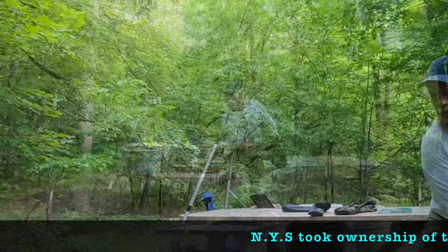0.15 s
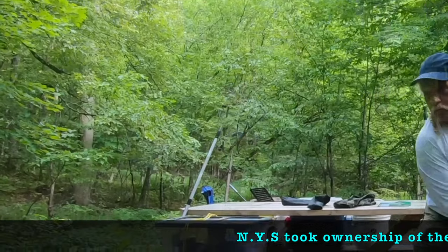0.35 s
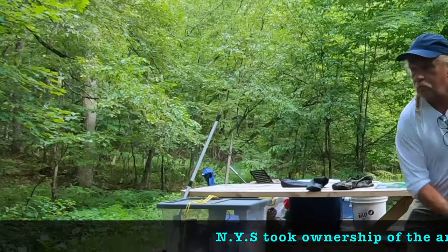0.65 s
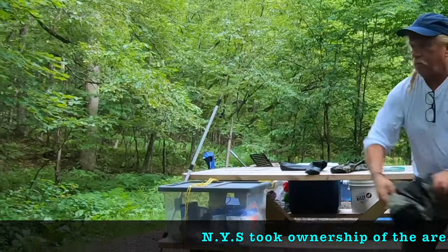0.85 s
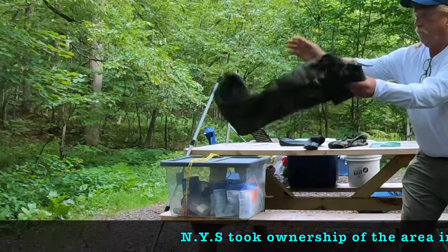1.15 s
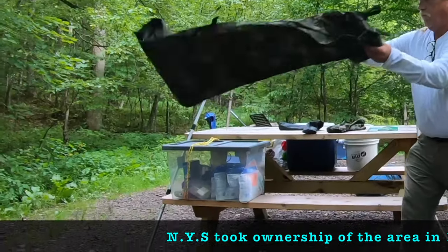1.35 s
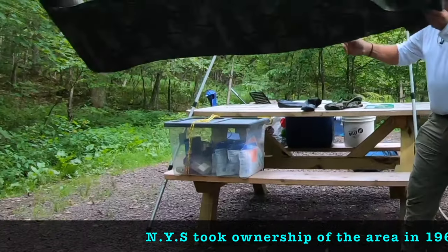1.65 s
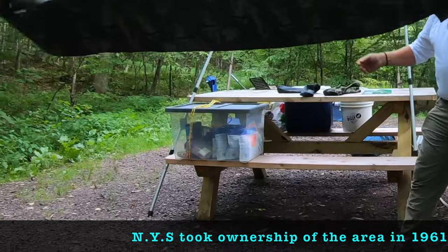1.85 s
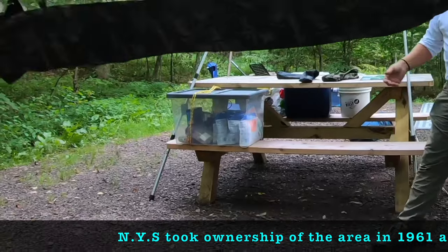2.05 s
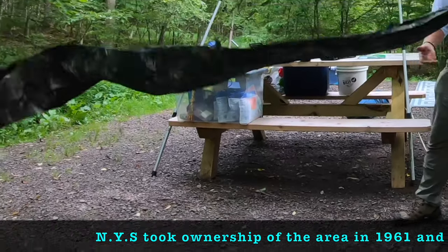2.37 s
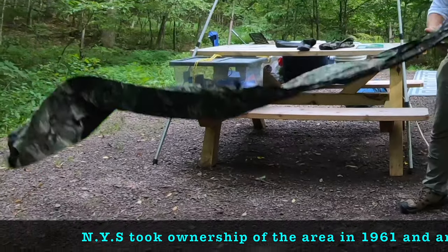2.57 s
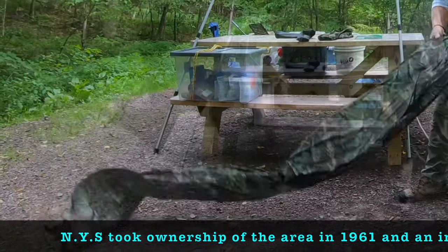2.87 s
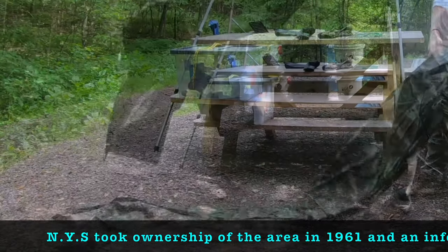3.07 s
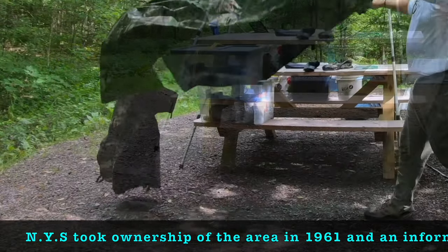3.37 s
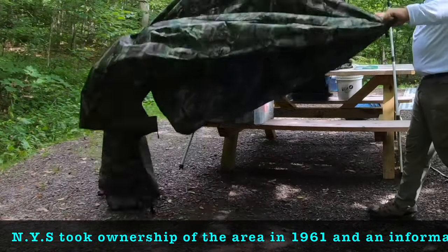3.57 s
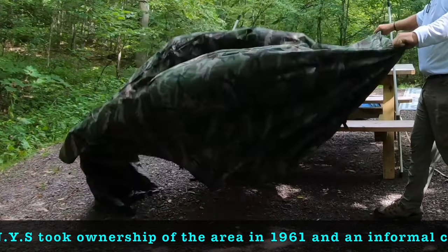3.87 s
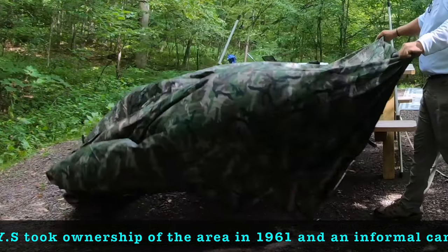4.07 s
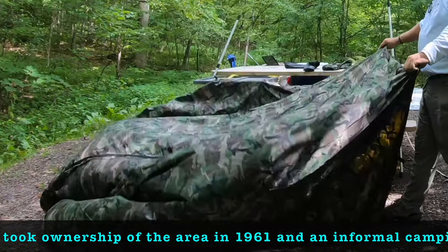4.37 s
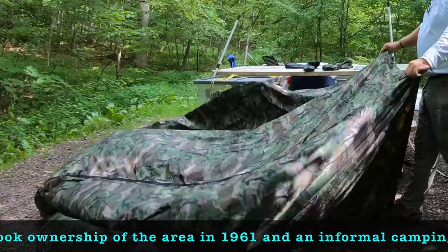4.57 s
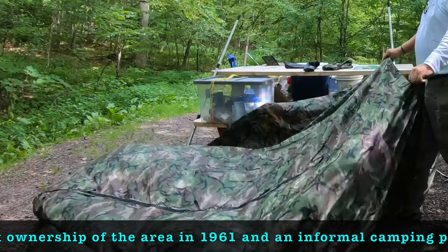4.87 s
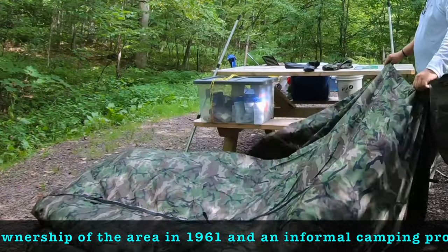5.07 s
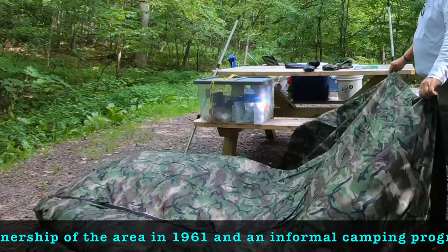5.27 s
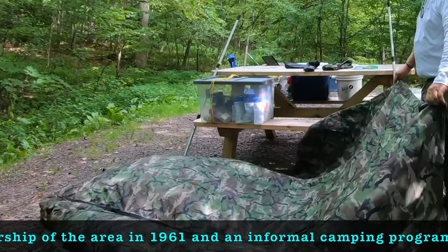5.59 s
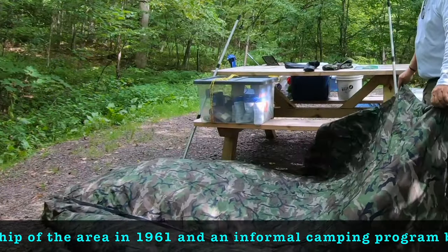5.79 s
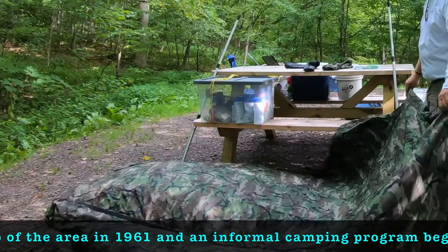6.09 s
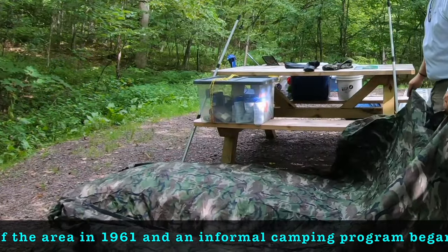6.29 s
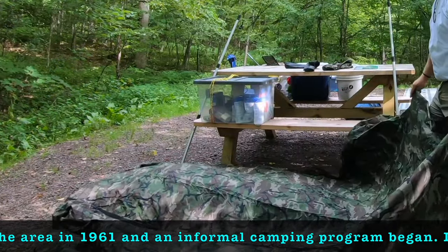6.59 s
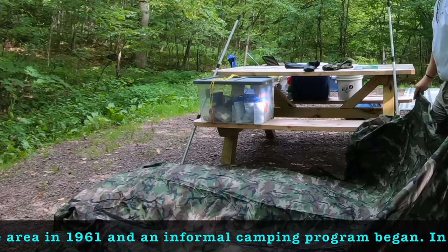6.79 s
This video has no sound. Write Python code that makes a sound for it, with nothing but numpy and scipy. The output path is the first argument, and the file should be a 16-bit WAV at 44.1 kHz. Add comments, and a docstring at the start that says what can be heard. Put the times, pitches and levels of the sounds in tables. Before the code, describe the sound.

Close by, a big fabric sheet opens with a light swish and a run of snaps, then flaps in heavy, muffled waves. Creases crackle and the cloth thumps as it pulls tight, loudest a little before halfway. After another low billow it eases into softer rustling as it is spread over the ground. The woodland behind is faint: a thin steady tone, far leaves and a brief low hum.

```python
"""A bright swish and quick snaps: a large tarp is shaken out, then spread on gravel in a wood.
It sounds deep and dull, as if slowed down. Creases buckle in dense clicks, folds snap open, and the
sheet billows, thumps and drums as it pulls taut; air whistles off the hem.
Behind it are a thin steady tone in the trees, a brief low hum, far leaves and faint hiss."""
import sys
import numpy as np
from scipy import signal
from scipy.fft import rfft, irfft, next_fast_len
from scipy.io import wavfile
from scipy.ndimage import uniform_filter1d

SR = 44100
rng = np.random.default_rng(int(sys.argv[2]) if len(sys.argv) > 2 else 0)


def to_wav(sig):
    """Store sig (one row per channel, or 1-D mono) as 16-bit WAV at the path in sys.argv[1].

    Samples outside -1..1 are clipped; the rate is SR.
    """
    pcm = np.clip(np.atleast_2d(sig), -1, 1) * 32767
    pcm = np.round(pcm).astype(np.int16)
    wavfile.write(sys.argv[1], SR, pcm.T)  # frames by channels


N = 306136
TIME_S = np.arange(N) / SR

# Flaps of the sheet. Each row: start of hold in seconds, rise in seconds per 20 dB, hold in seconds,
# level in dB, then deep gust, billow and fine crinkle in dB above that level.
FLAPS = [(.03, 0.062, 0.037, -34.5, -29, -14.5, -9.5), (.15, .02, 0.13, -23, -23, -6, -18),
         (.37, .015, 0.055, -30.5, -32, -13, -22.5), (.446, 0.11, 0.074, -26.5, -37, -15.5, -16.5),
         (.58, .1, 0.04, -20.5, -40, -12, -20), (0.807, 0.13, .12, -32, -30, -8, -21.5),
         (1.128, 0.11, .13, -24.5, -26, -7.5, -17.5), (1.368, .15, 0.05, -22, -40, -12.5, -20.5),
         (1.525, 0.24, 0.12, -23, -30, -11.5, -21), (1.71, 0.047, 0.045, -22, -28, -17, -21),
         (1.8, 0.051, 0.047, -25.5, -25, -15, -20.5), (2.0, 0.071, 0.028, -21.5, -14, -6, -20.5),
         (2.075, 0.045, .03, -16.5, -12, -8, -20.5), (2.139, .06, 0.081, -22, -29, -6.5, -23.5),
         (2.335, 0.089, 0.06, -20, -49, -14, -24), (2.521, 0.028, .02, -31, -41, -11, -21.5),
         (2.66, 0.03, .04, -30.5, -28, -7, -15.5), (2.702, 0.014, 0.03, -17.5, -16, -3, -16),
         (2.814, 0.014, 0.052, -20, -10, -2.5, -20), (2.9, .03, .02, -27.5, -16, -11, -9),
         (3.21, 0.09, .07, -28, -19, -6.5, -13.5), (3.312, 0.069, .12, -19.5, -16, -8.5, -21.5),
         (3.45, .08, .11, -20.5, -18, -10, -16.5), (3.602, 0.066, 0.061, -25.5, -22, -10, -20),
         (3.803, 0.041, .02, -26, -18, -3, -20.5), (4.081, 0.077, .03, -25, -4, -4, -20),
         (4.188, .03, 0.092, -26.5, -11, -5, -18.5), (4.742, 0.046, .02, -27.5, -29, -7, -15),
         (5.05, 0.056, 0.027, -31, -32, 1, -11.5), (5.188, 0.059, 0.015, -35, -37, -6, -8),
         (5.678, 0.093, 0.043, -30.5, -31, -8, -11.5), (5.895, .04, .025, -29.5, -40, -14, -9),
         (6.265, 0.06, 0.047, -31, -39, -8, -11), (6.41, .04, .025, -32, -40, -9, -11)]
# The sheet dragging and settling. Each row: time in seconds, level in dB, then deep gust, billow and
# fine crinkle in dB above that level.
DRAG = [(0, -49, -34, -16, -15), (.45, -39.5, -35, -8, -14), (.75, -36, -29, -9, -12),
        (1.03, -35.5, -25, -4, -12.5), (1.28, -29, -29, -10, -3), (1.86, -29, -22.5, -11, -15),
        (2.3, -29.5, -34, -12, -19.5), (2.62, -36.5, -25, -11, -16.5), (2.95, -36, -17, -5, -13.5),
        (3.11, -39.5, -27, -10.5, -16), (3.7, -32, -21.5, -2, -16), (3.95, -30, -14.5, -7, -13.5),
        (4.3, -25.5, -10, -4, -8), (4.55, -27, -16, -7.5, -6.5), (4.97, -31, -32.5, -9, -6),
        (5.49, -33, -32, -7.5, -10.5), (5.92, -32, -39, -15.5, -5.5), (6.4, -32.5, -37, -11, -7.5),
        (6.84, -33.5, -30, -3.5, -9), (6.94, -28, -28, -12, -15)]
# Crease sizes, deep to fine. Each row: top in Hz, clicks per cycle, size spread in dB, flicker in dB,
# share of the common shake, share of the quick motion, offset in dB, share of gust, billow or crinkle.
CREASE_BANDS = [(59, 0.9, 1.8, -0.5, 0.43, 0.65, -0.5, 1), (132, .5, 3.6, 2, 0.56, 0.88, -0.5, 1),
                (526, .4, 2.02, 1.17, 0.8, 0.89, -4.5, -0.13), (1220, .4, 1.4, 1.97, 0.87, 0.85, 2.5, 0.61),
                (3078, .4, 1.1, 0.8, 0.82, 0.8, 0, 0.99), (9000, .6, 1.2, 2.3, 0.79, 0.49, -17, 0.95)]
# Cloth spectrum before band levels are set. Each row: frequency in Hz, gain in dB.
CLOTH_SPECTRUM = [(18, -17), (38, -8.5), (52, -16), (66, -1.5), (160, 0), (250, -0.5), (500, -5),
                  (1000, -12), (1600, -16), (2600, -28), (3900, -33), (5000, -43), (7100, -54),
                  (8000, -77.5)]
# Cloth stereo width. Each row: frequency in Hz, side minus mid in dB.
CLOTH_WIDTH = [(30, -31.5), (80, -15), (170, -11.5), (350, -9.5), (700, -6.5), (1300, -12), (2400, -15),
               (4400, 1.5), (8000, -2)]
# Cloth position. Each row: time in seconds, left minus right in dB.
CLOTH_PAN = [(0.0, -2), (1.29, -2.5), (1.51, 0), (6.94, -0.3)]
# Folds snapping open. Each row: start in seconds, peak in dB, ring in Hz, left minus right in dB.
SNAPS = [(0.1285, -25, 1100, -4.0), (0.1758, -13, 400, 0), (0.367, -23, 466, -7), (0.443, -13.5, 584, -6),
         (0.483, -12.5, 435, -5), (0.555, -16, 420, -4), (0.903, -12.5, 700, -4), (0.964, -25, 900, 0),
         (1.106, -25, 404, 4), (1.384, -8.5, 506, -5), (1.994, -13, 574, -2), (2.275, -17.5, 439, -5),
         (2.492, -25, 700, 0), (2.521, -16.5, 630, -8), (2.582, -18.5, 464, -11), (2.702, -13, 1080, 6),
         (2.722, -11.5, 330, 2), (2.7265, -7.5, 1150, 6), (2.736, -16, 950, -2), (2.813, -19, 900, 5),
         (3.799, -23, 401, 9), (4.018, -19, 444, 3), (4.187, -14.5, 600, 4), (4.249, -11, 770, 3),
         (4.763, -14.5, 802, -6), (5.747, -19, 824, 1), (6.262, -20, 850, -2)]
# The sheet pulled taut or slapping the ground. Each row: start in seconds, level in dB, ring in Hz,
# t60 in seconds.
THUMPS = [(0.151, -14.5, 268, 0.036), (.222, -18, 244, 0.087), (0.581, -16.5, 204, 0.036),
          (.628, -12, 248, 0.05), (1.424, -12, 218, 0.053), (1.714, -8, 230, 0.038),
          (2.124, -9, 221, 0.013), (2.352, -13, 176, 0.037), (2.7315, -6.5, 247, 0.047),
          (2.8176, 1, 130, 0.018), (4.0913, -7, 110, 0.051), (4.109, -16, 76, 0.15),
          (4.194, -14, 116, 0.046), (4.2818, -16, 110, 0.04), (5.672, -21, 130, 0.05)]
# Thin ticks on the sharpest peaks. Each row: time in seconds, relative level in dB.
TICKS = [(0.176, -49), (0.4843, -50), (0.628, -54), (1.1932, -54), (1.4067, -47), (1.708, -48),
         (2.0911, -54), (2.1246, -55), (4.1889, -56), (2.7018, -49), (2.7224, -50), (2.7264, -49),
         (2.7312, -43), (2.8174, -38.5), (3.4111, -53), (4.0896, -48), (4.2502, -44), (6.2806, -57)]
# The taut sheet drumming. Each row: time in seconds, pitch in Hz, level in dB.
DRUM = [(1.486, 144.7, -31), (1.52, 151.6, -24.5), (1.55, 166, -20), (1.578, 168, -41), (1.615, 163, -29.5),
        (1.652, 162, -14), (1.676, 177, -28), (1.688, 182.5, -21), (1.702, 183.3, -30), (1.718, 174.6, -14),
        (1.74, 166.6, -26), (1.758, 166.3, -12), (1.785, 164.4, -25), (1.84, 169.6, -33)]
# Air whistling off the hem. Each row: time in seconds, level in dB.
HEM_LEVELS = [(1.42, -52), (1.52, -41.5), (1.64, -43.5), (1.77, -44.5), (1.86, -53)]
# Opening swish. Each row: time in seconds, mid level in dB.
SWISH_LEVELS = [(0.0, -73), (0.03, -51), (.085, -56), (.115, -62), (.16, -64), (0.36, -78)]
# Swish spectrum. Each row: frequency in Hz, relative gain in dB.
SWISH_SPECTRUM = [(1760, -36), (3000, 1), (4440, -13), (5270, -5.5), (8070, -10.5), (12900, -34),
                  (15500, -54.5)]
# Thin tone, likely insects. Each row: pitch in Hz, waver in Hz, left minus right in dB.
TONES = [(868, 2.004, -3.5)]
# Swell of that tone. Each row: time in seconds, level in dB.
TONE_LEVELS = [(0, -49.5), (2.5, -65), (4.2, -45), (5.2, -43.5), (6.0, -42), (6.94, -43.5)]
# Low hum that swells briefly. Each row: time in seconds, pitch in Hz, level in dB.
HUM = [(5.7, 214.8, -42.5), (6.21, 216.7, -41.5), (6.3, 234, -48)]

FLAP_FALL_DB_PER_S, BLEND_S, SWEEP_S = 240.5, 0.029, 0.12
CALM_SHARE = 0.45  # unrest left while the sheet only drags
SHAKE_KICK_DB, SHAKE_DECAY_S = 4, 0.006
SNAP_T60_CYCLES, CRACK_HZ, CRACK_DB = 5.5, 2600, -19
SUCTION_SHARE = 0.32  # of a thump's peak
TICK_GAIN_DB, TICK_DELAY_S, TICK_TAIL_DB, TICK_TAIL_S = 12, 0.0012, -22, 0.004
HEM_HZ, HEM_WIDTH_HZ, HEM_TOP_HZ = 3900, 1200, 6800
LEAVES_DB, LEAVES_TOP_HZ, HISS_DB, HISS_TOP_HZ = -57.5, 2600, -93.5, 10000
TOP_HZ = 15600
FFT_SIZE = next_fast_len(N)
BINS_HZ = np.fft.rfftfreq(FFT_SIZE, 1 / SR) + 1


def rustle():
    """Creases buckle at random; big ones follow each jerk of the sheet, the finest more its slow sweep."""
    motion_db, flapping, gust_db, billow_db, crinkle_db = motion()
    unrest = CALM_SHARE + (1 - CALM_SHARE) * flapping
    window = int(SWEEP_S * SR)
    sweep_db = 10 * np.log10(uniform_filter1d(uniform_filter1d(undb(2 * motion_db), window), window))
    colour = bin_gains(CLOTH_SPECTRUM) * np.array([np.ones(len(BINS_HZ)), bin_gains(CLOTH_WIDTH)])
    shake_db = 1.5 * unrest * walk(28) + aftershake_db()
    pitches_hz = 24 * 2 ** (np.arange(26) / 3)
    out, low_hz = 0, 1
    for band, control_db in zip(CREASE_BANDS, [gust_db, billow_db] + 4 * [crinkle_db]):
        top_hz, density, spread_db, flicker_db, shake, quick, offset_db, share = band
        clicks = sum(undb(flicker_db * unrest * walk(13)) * creases(hz, density, spread_db)
                     for hz in pitches_hz[(pitches_hz >= low_hz) & (pitches_hz < top_hz)])
        low_cut = 1 / np.sqrt(1 + (low_hz / BINS_HZ) ** 10)  # nothing rings below its own size
        spectrum = rfft(clicks * undb(shake * shake_db), FFT_SIZE)
        mid, side = irfft(spectrum * colour * low_cut, FFT_SIZE)[:, :N]
        level_db = sweep_db + quick * (motion_db - sweep_db) + offset_db + share * control_db
        out = out + undb(level_db) / mid.std() * np.array([mid + side, mid - side])
        low_hz = top_hz
    return out * pan(curve(CLOTH_PAN)[0])


def motion():
    """Flaps rise, hold and fall over the drag; the loudest sets gust, billow and crinkle."""
    drag_db, *blend_db = curve(DRAG)
    power = undb(2 * drag_db)
    weighted = power * np.array(blend_db)
    for start_s, rise_s, hold_s, level_db, *above_db in FLAPS:
        down_db = 20 / rise_s * np.maximum(start_s - TIME_S, 0)
        down_db += FLAP_FALL_DB_PER_S * np.maximum(TIME_S - start_s - hold_s, 0)
        near = np.flatnonzero(down_db < 60)
        flap_power = undb(2 * (level_db - down_db[near]))
        power[near] += flap_power
        weighted[:, near] += flap_power * np.array(above_db)[:, None]
    flapping = 1 - undb(2 * drag_db) / power
    return 10 * np.log10(power), flapping, *uniform_filter1d(weighted / power, int(BLEND_S * SR))


def creases(hz, clicks_per_cycle, spread_db):
    """Buckling clicks of uneven size ring in a third-octave band; rows are mid and side."""
    count = int(clicks_per_cycle * hz * N / SR)
    starts = rng.integers(0, N, count)
    sizes = rng.choice([-1, 1], count) * undb(spread_db * np.minimum(rng.exponential(size=count), 4))
    clicks = np.zeros((2, N))
    clicks[:, starts] = sizes, sizes * rng.standard_normal(count)
    return butter(clicks, 2, hz * 2 ** np.array([-1 / 6, 1 / 6]), "band") / clicks[0].std()


def aftershake_db():
    """Each snap shakes the creases at once, then dies away."""
    kicks_db = np.zeros(N)
    kicks_db[(np.array(SNAPS)[:, 0] * SR).astype(int)] = SHAKE_KICK_DB
    return signal.lfilter([1], [1, -np.exp(-1 / (SHAKE_DECAY_S * SR))], kicks_db)


def snaps():
    """Folds snap open: a short ring with a bright crack."""
    out = np.zeros((2, N))
    for start_s, peak_db, hz, pan_db in SNAPS:
        gains = undb(peak_db) * pan(pan_db)[:, None]
        add(out, start_s, gains * ring(hz, SNAP_T60_CYCLES / hz, push_cycles=0.28))
        crack = ring(CRACK_HZ * undb(rng.standard_normal()), SNAP_T60_CYCLES / CRACK_HZ, push_cycles=0.22)
        add(out, start_s, gains * undb(CRACK_DB) * crack)
    return out


def thumps():
    """The sheet pulls taut or slaps the ground: half a cycle of suction, then a low ring."""
    out = np.zeros((2, N))
    for start_s, level_db, hz, t60_s in THUMPS:
        suction = -SUCTION_SHARE * np.sin(np.linspace(0, np.pi, int(SR / hz / 2)))
        add(out, start_s - 0.5 / hz, undb(level_db) * suction)
        add(out, start_s, undb(level_db) * ring(hz, t60_s, push_cycles=0.15))
    return out


def ticks():
    """Thin ticks: one sharp click, then a faint crackle."""
    out = np.zeros((2, N))
    for time_s, level_db in TICKS:
        tick = undb(TICK_TAIL_DB) * rng.standard_normal((2, 600)) * np.exp(-TIME_S[:600] / TICK_TAIL_S)
        tick[:, 0] = undb(0.8 * rng.standard_normal(2))
        add(out, time_s + TICK_DELAY_S, undb(level_db + TICK_GAIN_DB) * tick)
    return butter(out, 3, 5000, "high")


def drum():
    """The taut sheet drums on one gliding low pitch."""
    return wavering(*curve(DRUM, outside_db=-64.5), roughness=0.18)


def hem_whistle():
    """Air sheds off the hem: noise in one resonance, dull on top."""
    b, a = signal.iirpeak(HEM_HZ, HEM_HZ / HEM_WIDTH_HZ, fs=SR)
    air = signal.lfilter(b, a, signal.lfilter(b, a, rng.standard_normal((2, N))))
    level_db = curve(HEM_LEVELS, outside_db=-120)[0] + 1.9 * walk(30)
    return undb(level_db) * unit_rms(butter(air, 8, HEM_TOP_HZ))


def swish():
    """Fine bright rustle at the start, partly different left and right."""
    spectra = rfft(rng.standard_normal((2, FFT_SIZE))) * bin_gains(SWISH_SPECTRUM)
    mid, side = map(unit_rms, irfft(spectra, FFT_SIZE)[:, :N])
    level_db = curve(SWISH_LEVELS, outside_db=-120)[0] + 2.4 * walk(54)
    return undb(level_db) * np.array([mid + 0.6 * side, mid - 0.6 * side])


def wood():
    """A thin tone, a brief hum, leaves stirring far off and faint hiss."""
    swell_db = curve(TONE_LEVELS)[0]
    tone = 0
    for hz, waver_hz, pan_db in TONES:
        voice = wavering(hz + waver_hz * walk(4), swell_db + 0.8 * walk(3), roughness=0.4)
        tone = tone + pan(pan_db)[:, None] * voice
    far_gains = bin_gains(CLOTH_SPECTRUM) / np.sqrt(1 + (LEAVES_TOP_HZ / BINS_HZ) ** 6)
    leaves = unit_rms(irfft(rfft(rng.standard_normal((2, FFT_SIZE))) * far_gains, FFT_SIZE)[:, :N])
    hiss = butter(rng.standard_normal((2, N)), 1, HISS_TOP_HZ)
    hum = wavering(*curve(HUM, outside_db=-77.5), roughness=0.15)
    return tone + hum + undb(LEAVES_DB) * leaves + undb(HISS_DB) * hiss


def ring(hz, t60_s, push_cycles):
    """Damped sine, peak 1; the length of the push rounds its front."""
    t = np.arange(int(t60_s * SR) + 2) / SR
    y = np.sin(2 * np.pi * hz * t) * np.exp(-np.log(1000) * t / t60_s)
    y = np.convolve(y, np.hanning(int(push_cycles * SR / hz) + 3))
    return y / np.abs(y).max()


def wavering(hz, rms_db, roughness):
    """Tone with slight shake in level and phase."""
    amplitude = np.sqrt(2) * undb(rms_db + 4.9 * roughness * walk(40))
    return amplitude * np.sin(2 * np.pi * np.cumsum(hz) / SR + roughness * walk(25))


def walk(rate_hz):
    """Random steps, smoothed twice; RMS 1."""
    steps = np.repeat(rng.standard_normal(int(rate_hz * N / SR) + 2), 8)
    steps = uniform_filter1d(uniform_filter1d(steps, size=8), size=8)
    return np.interp(TIME_S * rate_hz * 8, np.arange(len(steps)), unit_rms(steps))


def curve(table, outside_db=None):
    """Table columns per sample; if given, the last fades to outside_db within 40 ms of either end."""
    times_s, *columns = np.transpose(table)
    out = [np.interp(TIME_S, times_s, column) for column in columns]
    if outside_db is not None:
        padded_s = [times_s[0] - 0.04, *times_s, times_s[-1] + 0.04]
        out[-1] = np.interp(TIME_S, padded_s, [outside_db, *columns[-1], outside_db])
    return out


def bin_gains(table):
    """A (Hz, dB) table as gain per FFT bin."""
    hz, db = np.transpose(table)
    return undb(np.interp(np.log(BINS_HZ), np.log(hz + 1), db))


def butter(x, order, hz, kind="low"):
    return signal.sosfilt(signal.butter(order, hz, kind, fs=SR, output="sos"), x)


def add(out, start_s, sound):
    i = int(start_s * SR)
    out[:, i:i + sound.shape[-1]] += sound[..., :N - i]


def pan(db):
    return undb(np.array([db, -db]) / 2)


def undb(db):
    return 10 ** (np.asarray(db) / 20)


def unit_rms(x):
    return x / np.sqrt(np.mean(x ** 2))


def scene():
    """The tarp over the wood."""
    cloth = rustle()
    blows = butter(snaps() + thumps(), 1, 40, "high")  # free cloth holds no steady pressure
    return cloth + blows + ticks() + drum() + hem_whistle() + swish() + wood()


def record(dry):
    """Clip near full scale, then cut the top."""
    clipped = np.clip(dry, -0.99, 0.99)
    return signal.sosfilt(signal.ellip(10, 0.1, 80, TOP_HZ, fs=SR, output="sos"), clipped)


dry = scene()
out = record(dry)
to_wav(out)
```